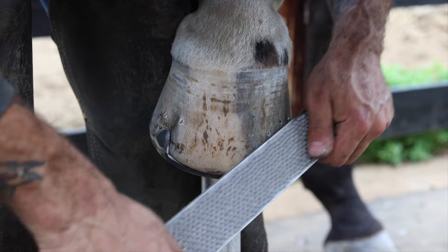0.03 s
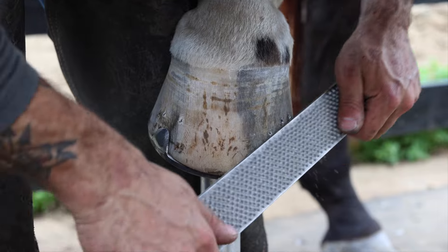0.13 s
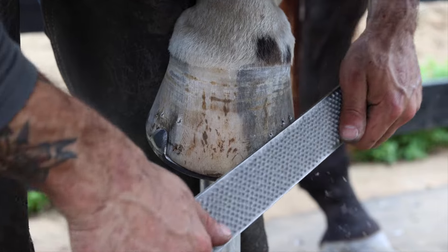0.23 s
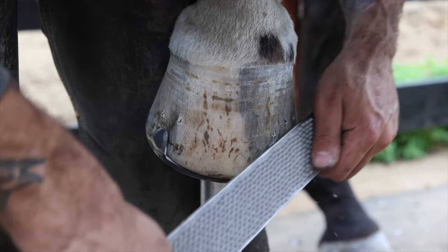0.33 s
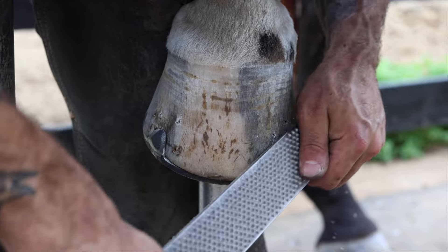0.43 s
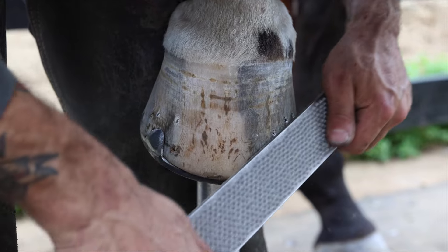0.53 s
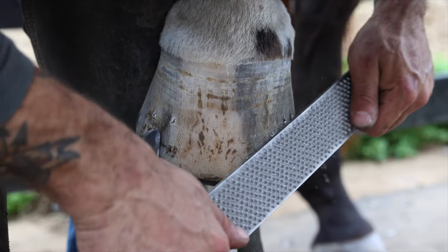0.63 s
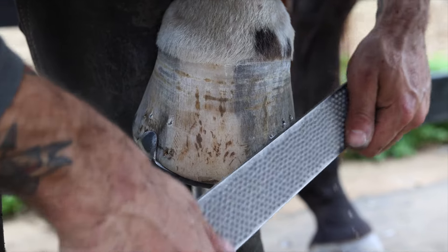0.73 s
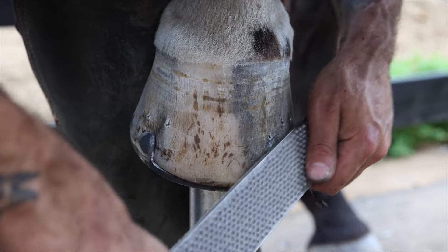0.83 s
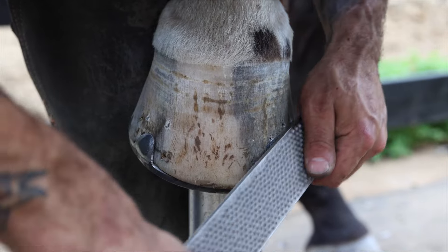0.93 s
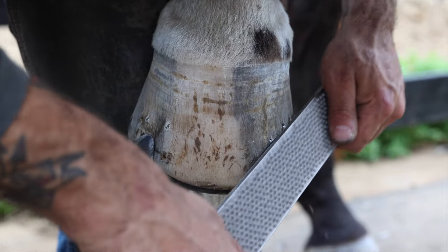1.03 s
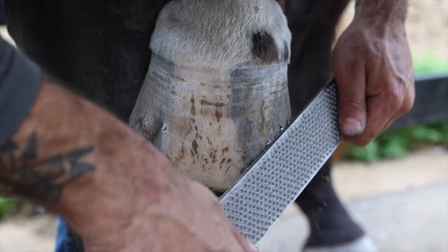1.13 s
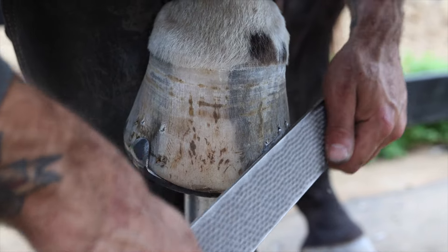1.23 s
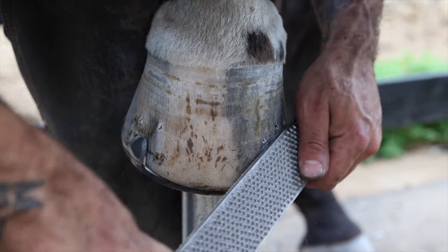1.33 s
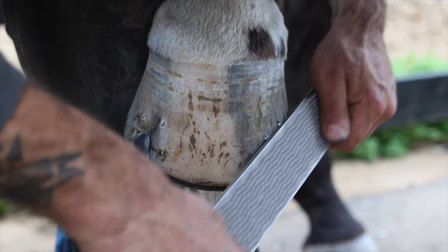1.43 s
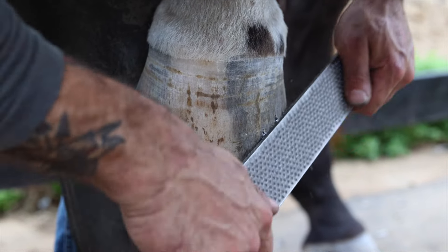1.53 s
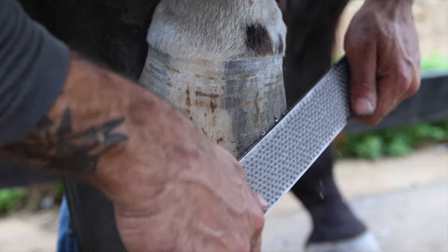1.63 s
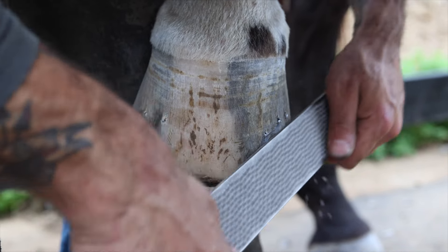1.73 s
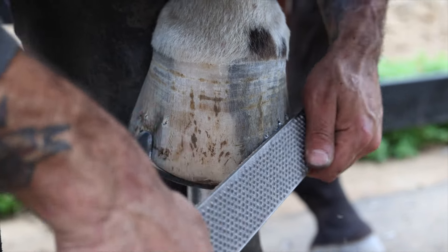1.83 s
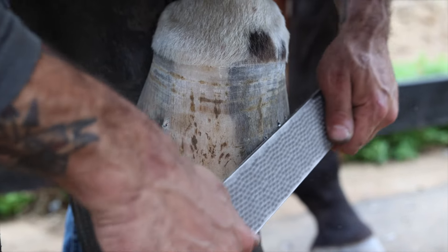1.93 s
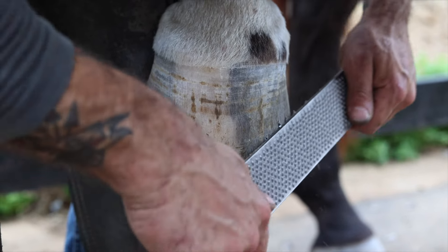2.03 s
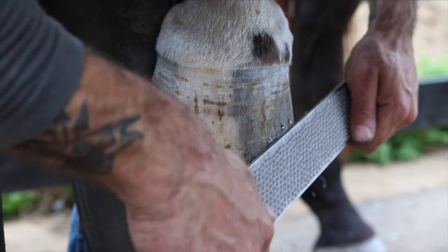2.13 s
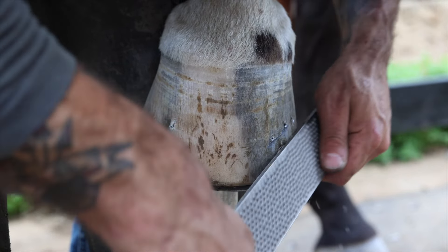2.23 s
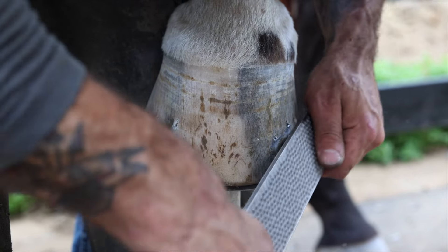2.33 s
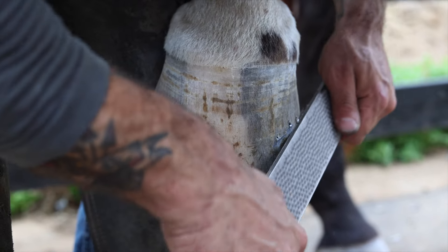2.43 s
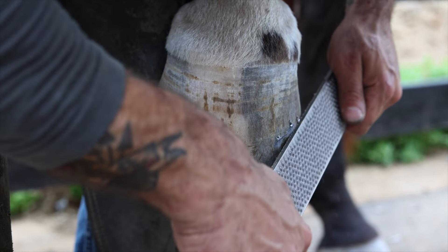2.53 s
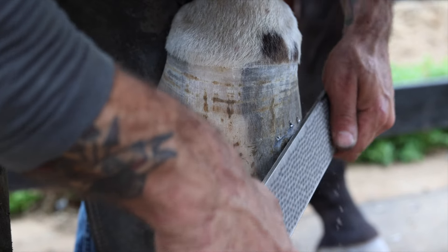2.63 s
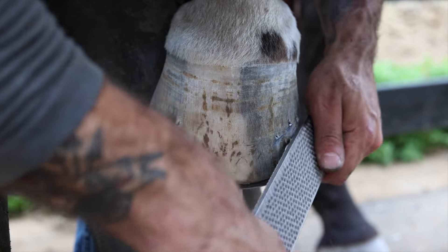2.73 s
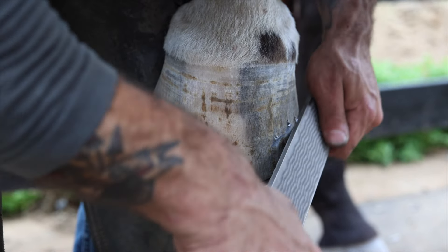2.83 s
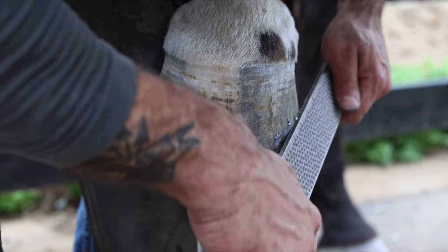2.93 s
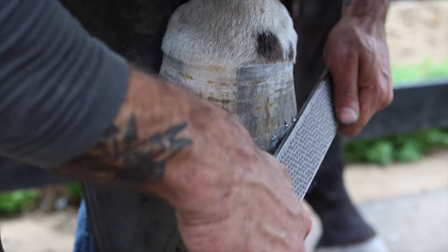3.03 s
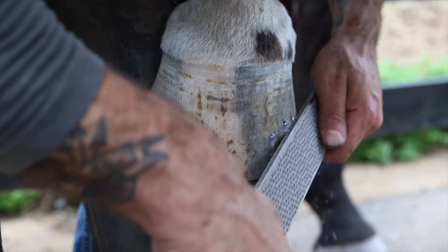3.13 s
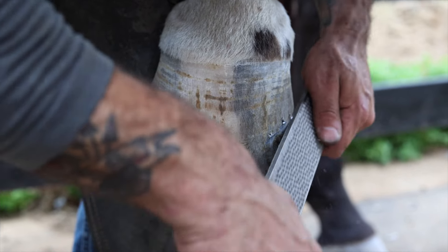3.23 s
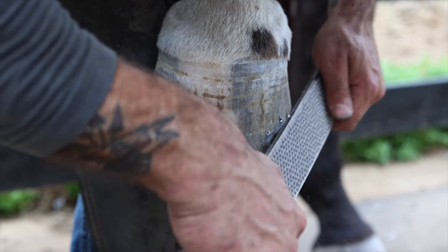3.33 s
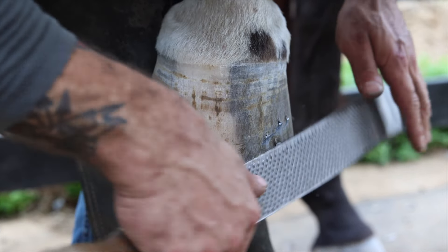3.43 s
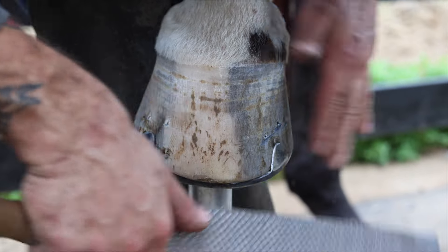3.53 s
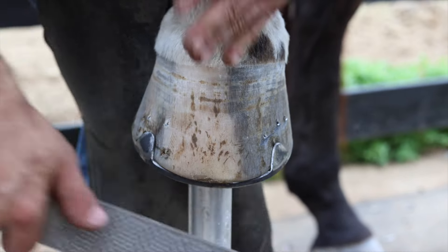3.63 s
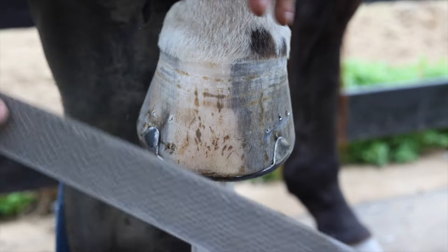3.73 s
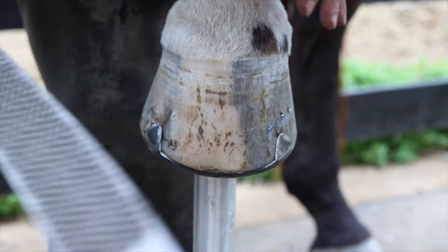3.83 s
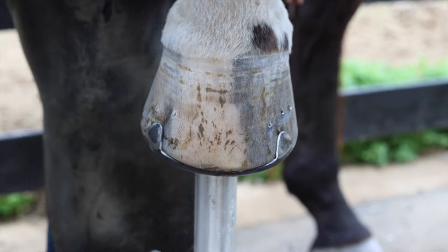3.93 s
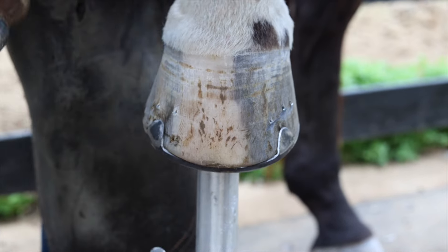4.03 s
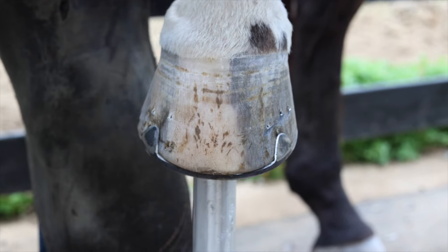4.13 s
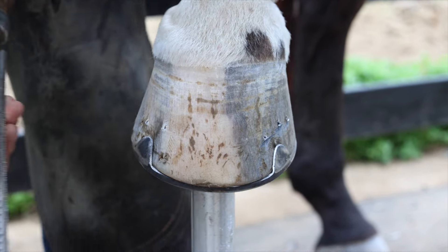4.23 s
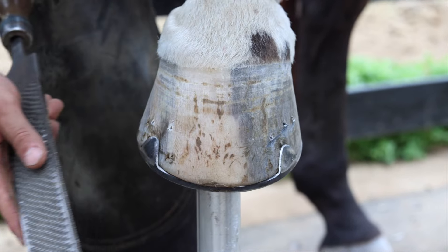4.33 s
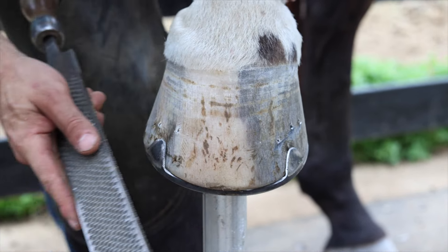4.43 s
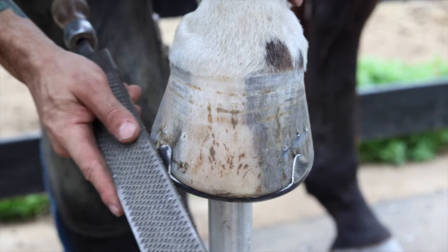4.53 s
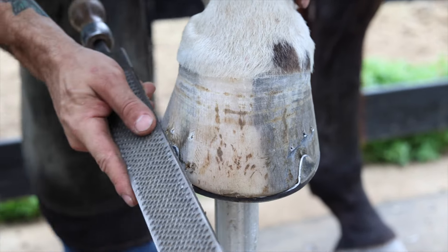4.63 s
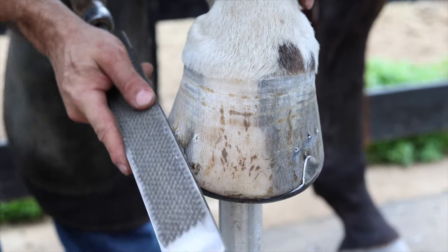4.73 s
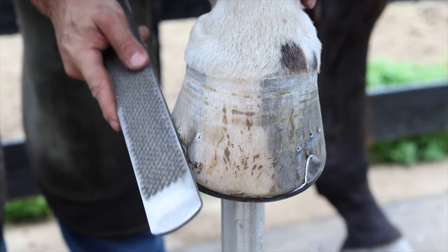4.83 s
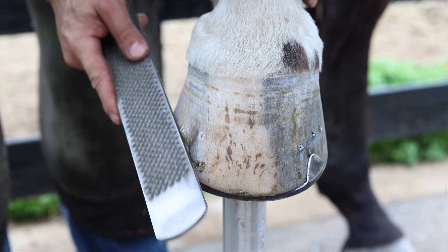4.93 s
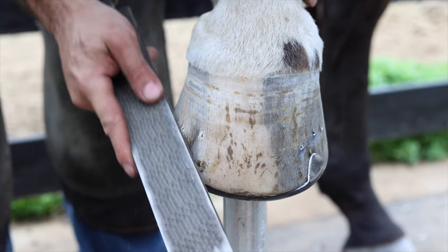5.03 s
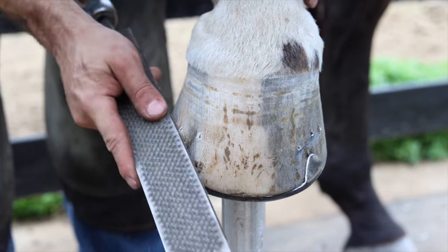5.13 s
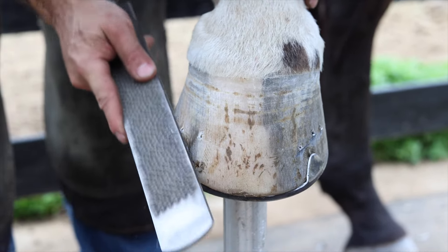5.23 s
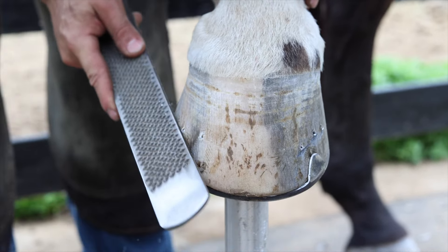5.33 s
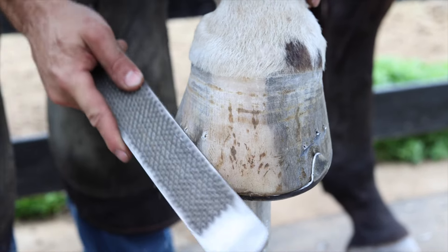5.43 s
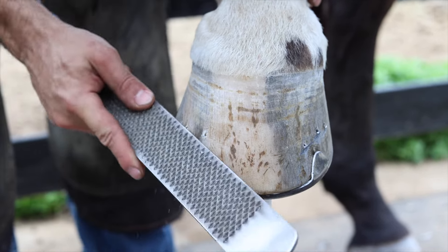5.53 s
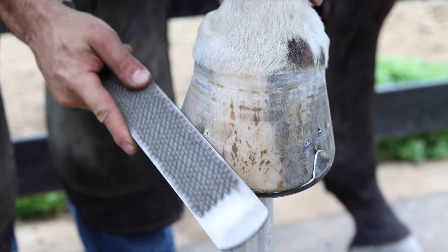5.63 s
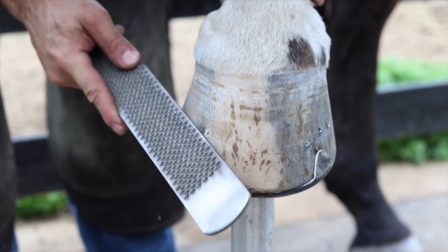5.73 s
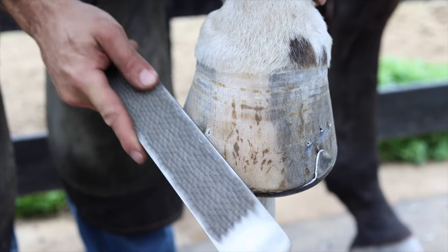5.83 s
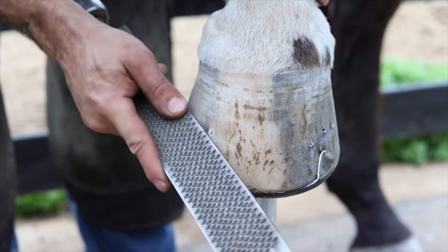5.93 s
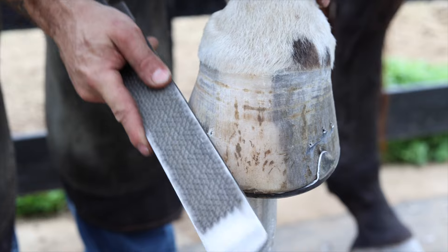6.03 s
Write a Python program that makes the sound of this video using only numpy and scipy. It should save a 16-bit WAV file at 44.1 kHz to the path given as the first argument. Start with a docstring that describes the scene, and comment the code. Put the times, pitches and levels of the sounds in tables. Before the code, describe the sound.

Coarse metallic filing on a horse's hoof outdoors, close up, with low clothing rumble and thumps, a short rustling pause, then softer strokes.

```python
"""A flat steel rasp is pushed and drawn across a hoof in the open air, first on one side, then, after a
change of grip, on the other. Random clicks shaped by each stroke make the grit and the hoof's thrum; noise
with the same strokes rings the blade, and knocks ring it too. A microphone worn on the body picks up rumble,
rubs and thumps from moving clothes, made of coloured clicks and short low tones. Brushing noise and ticks
mark the change of grip, and a faint air noise lies under it all."""
import sys
import numpy as np
from scipy import signal
from scipy.fft import rfft, irfft, next_fast_len
from scipy.io import wavfile
from scipy.ndimage import uniform_filter1d

SR = 44100
rng = np.random.default_rng(int(sys.argv[2]) if len(sys.argv) > 2 else 0)


def generate_wav(sig):
    """Save sig (samples, or channels by samples) to the path in sys.argv[1] as 16-bit PCM at SR."""
    pcm = np.round(np.clip(np.atleast_2d(sig).T, -1, 1) * 32767).astype(np.int16)
    wavfile.write(sys.argv[1], SR, pcm)


N = 268569


def gain_of(db):
    """Turns dB into a plain multiplier."""
    return 10 ** (np.asarray(db) / 20)


def evened(x):
    """Scales x to an average strength (rms) of 1."""
    return x / np.sqrt(np.mean(x ** 2) + 1e-20)


def add(mix, start_s, sound):
    """Adds a sound into mix from start_s on, cut off at the end of mix."""
    part = mix[round(start_s * SR):][:len(sound)]
    part += sound[:len(part)]


def wander(per_s):
    """A slow random drift of rms 1, heading for a new chance value per_s times a second."""
    steps = rng.standard_normal(1000)
    return evened(np.interp(np.arange(N) / SR * per_s, np.arange(1000), steps))


def clicks(per_s, spread_db):
    """Random clicks of uneven size, about per_s each second, at rms 1."""
    boost_db = spread_db * np.minimum(rng.exponential(1, N), 4)
    size = gain_of(boost_db) * rng.standard_normal(N)
    return evened(size * (rng.random(N) < per_s / SR))


def colour(x, points):
    """Filters x by a curve of (Hz, dB) points, at rms 1."""
    point_hz, point_db = np.transpose(points)
    size = next_fast_len(N)
    hz = np.fft.rfftfreq(size, 1 / SR)
    curve_db = np.interp(np.log(hz + 1), np.log(point_hz + 1), point_db, left=-90)
    return evened(irfft(rfft(x, size) * gain_of(curve_db), size)[:N])


def patchy(x, depth_db):
    """Makes the colour shift in random patches of time and pitch."""
    spectrum = signal.stft(x, nperseg=256)[2]
    patches = rng.standard_normal(spectrum.shape)
    patches = uniform_filter1d(patches, size=4, axis=0)  # smooth across pitch
    patches = uniform_filter1d(patches, size=9, axis=1)  # smooth across time
    return evened(signal.istft(spectrum * gain_of(depth_db * evened(patches)), nperseg=256)[1][:N])


# a contact starts and ends this many dB down (times follow), along these powers
EDGE_DB, RISE_CURVE, RELEASE_CURVE = 39, 1.23, 0.81


def contact(rows, over_db=0, follow=1, lag_s=0, early_db=0):
    """Gain of contacts that rise, hold and let go; a layer sits over_db above the main one,
    moves follow dB for each dB of pressure and loses early_db along the hold."""
    out = np.zeros(N)
    over_db = over_db + np.zeros(len(rows))
    early_db = early_db + np.zeros(len(rows))
    for row, over, early in zip(rows, over_db, early_db):
        start, rise, hold, release, db, change_db = row[:6]
        t = np.arange(0, rise + hold + release, 1 / SR)
        spans = [(0, rise), (rise, hold), (rise + hold, release)]
        # each stage runs from 0 to 1
        rising, held, leaving = (np.clip((t - s) / max(span, 1e-3), 0, 1) for s, span in spans)
        edges = (1 - rising) ** RISE_CURVE + leaving ** RELEASE_CURVE
        shape_db = change_db * held - EDGE_DB * edges
        add(out, max(start + lag_s, 0), gain_of(db + over + follow * shape_db - early * held))
    return uniform_filter1d(out, size=90)  # about 2 ms of smoothing


# Teeth tearing horn, between the modes. Each row: pitch in Hz, strength in dB per Hz.
GRIT_TONE = [(500, -42.5), (1000, -20.5), (1900, 1.5), (2400, 20), (2900, 24), (4200, 19.5), (6200, 17),
             (7500, 8), (9000, -30)]


def grit(pressure, teeth):
    """Teeth tearing uneven horn: a dense stream of clicks with a patchy colour."""
    return pressure * patchy(colour(teeth, GRIT_TONE), depth_db=6.0)


# The finest chips. Each row: pitch in Hz, strength in dB per Hz.
CHIP_TONE = [(6500, -7.5), (8200, 5.5), (9700, -3.5), (11500, 6.5), (13000, -11), (14300, -19)]


def fine_chips(pressure, teeth):
    """The finest chips fizz: the same tooth clicks, coloured brighter."""
    return pressure * patchy(colour(teeth, CHIP_TONE), depth_db=5)


# Hoof and stand. Each row: pitch in Hz, strength in dB per Hz.
THRUM_TONE = [(120, -8.5), (220, 5.5), (350, 3.5), (500, -1.5), (600, -12.5), (800, -12.5), (1300, -21.5),
              (2000, -31)]


def hoof_thrum(pressure):
    """The hoof and its stand thrum: sparser clicks, coloured low."""
    return pressure * colour(clicks(per_s=1600, spread_db=2.0), THRUM_TONE)


def knock_train(starts_s, levels_db):
    """A short round push for each knock of the blade."""
    out = np.zeros(N)
    for start_s, db in zip(starts_s, levels_db):
        add(out, start_s, gain_of(db) * np.hanning(9))
    return out


REGRIP_S = 4.0  # the second grip begins


def ring(force, knocks, pitches, modes, drift_db):
    """Each mode is a resonance driven by noise and knocks; it swells on its own as the contact slides."""
    t = np.arange(N) / SR
    knots = np.arange(0, N / SR + .1, .045)  # a new chance swell every 45 ms
    out = np.zeros(N)
    for hz, (width, first_db, second_db, knock_db) in zip(pitches, modes):
        grip_db = np.where(knots > REGRIP_S, second_db, first_db)
        swell = gain_of(grip_db + drift_db * rng.standard_normal(len(knots)))
        push = force * np.interp(t, knots, swell) * rng.standard_normal(N)
        push += gain_of(knock_db) * knocks
        r = np.exp(-np.pi * width / SR)
        skirt = np.exp(-np.pi * 500 / SR)  # a second stage, 500 Hz wide, darkens the valleys
        turn = np.exp(2j * np.pi * hz / SR)
        rung = signal.lfilter([1 - skirt], np.poly([r * turn, skirt * turn]), push)
        out += np.sqrt(2 - 2 * r * r) * rung.imag
    return out


# The blade knocks or catches on the hoof.
# Each row: time in seconds, push in dB, push on the twisting mode in dB over it.
KNOCKS = [(0.0902, -35, -28), (0.378, -24, -9), (0.405, -34.5, 24), (0.4246, -16, 1), (0.483, -14, -14),
          (0.835, -39, -20), (0.8627, -45, -19.5), (0.9034, -41.5, -5), (0.9204, -18.5, -13),
          (1.3287, -27, -34), (1.373, -10.5, -22), (1.7499, -34, -15.5), (1.8408, -33, 0),
          (1.8506, -40, 2.5), (1.8692, -35, -20), (1.9814, -13.5, -14.5), (1.998, -8.5, -17),
          (2.0161, -6.5, -13), (2.3277, -30.5, 13.5), (2.3379, -23, 11), (2.435, -27, -20),
          (2.686, -28.5, -11), (2.726, -15.5, -10), (2.8977, -24.5, -21), (3.334, -24, -7),
          (4.6773, -27, -40), (4.7713, -43, -27), (4.79, -55, -37), (4.8183, -33.5, -16),
          (5.2997, -32, -34), (5.5253, -35, -23), (5.9294, -40, -38)]
# Pitches in Hz, one row a group: four of blade bending from low to high, the hoof stand, one twisting mode.
MODE_HZ = [
    [1050, 1200, 1540],
    [1950, 2210, 2410, 2610, 3010],
    [3600, 3880, 4560, 4740, 5625, 6250, 6735, 7390, 7980],
    [9295, 9970, 10700, 12150, 12600],
    [140, 450, 500],
    [1700],
]
# The same modes. Each entry: width in Hz, dB in the first grip, dB in the second grip, dB when knocked.
MODE_RING = [
    [(60.6, -25.5, -13, -24.5), (50, -33, -1.5, -22.5), (39.2, 2, -10.5, -1.5)],
    [(200, -10.5, 2.5, -18), (40, -1.5, 3.5, -7.5), (71, -31, 5.5, -31), (60, -10, 0, -16.5),
     (80.5, -6.5, -20, -24)],
    [(90, -8.5, -4, -9.5), (72.3, -3, 3, -7), (53.7, -7, -2, -10.5), (50, -1, -7.5, -9.5),
     (65, 2, -2, -11.5), (306.4, -19.5, -11, -5), (69.9, -0.5, -9.5, -24), (65, -24, -18.5, -23),
     (66.9, -15.5, -2, -5)],
    [(90, -2, 2, -16.5), (60, -6, -10, -17.5), (110, -5, -7, -32), (80, -3, -11.5, -38.5),
     (120, -0.5, -8, -30.5)],
    [(21.6, -1, -3.5, -40), (25, -6.5, -2, -32.5), (50.4, -3.5, -32, -32.5)],
    [(70, -5, -16, -1.5)],
]
# The same groups. Each row: dB over the pressure that drives it, drift in dB as the contact slides.
GROUPS = [(-6, 1.9), (-14, 2.5), (-12, 6), (-6, -5.5), (-0.5, 1.9), (-13, 5.5)]


def ringing(pressures):
    """Noise under the stroke pressure, and knocks, ring the blade and the hoof stand group by group."""
    starts_s, knock_db, twist_db = np.transpose(KNOCKS)
    knocks = knock_train(starts_s, knock_db)
    twists = knock_train(starts_s, knock_db + twist_db)
    blows = [knocks] * 5 + [twists]
    out = np.zeros(N)
    for pressure, blow, group, pitches, modes in zip(pressures, blows, GROUPS, MODE_HZ, MODE_RING):
        share_db, drift_db = group
        out += ring(pressure * gain_of(share_db), blow, pitches, modes, drift_db)
    return out


# Short draws and long pushes in turn, with a few light grazes between.
# Each row: start, rise, hold and release in seconds, grit level in dB, change over the hold in dB,
# then in dB over the grit: lowest blade modes, upper blade modes, finest chips, hoof thrum.
STROKES = [ (0.0, 0.002, 0.031, 0.025, -46, -12.5, 20.5, 9, -25, -11),
           (0.048, 0.047, 0.16, 0.067, -47.5, -4, 12.5, 8, -17, -8),
           (0.301, 0.034, 0.068, .03, -55.5, 6.5, 14.5, 1, -23, -10),
           (0.404, 0.025, .06, 0.021, -34, 3, 7, 5, -30, -30),
           (0.502, 0.091, .13, 0.14, -33.5, -16.5, 3.5, 3, -21, -12),
           (0.785, 0.027, 0.057, 0.026, -62, 4.5, 6.5, 4, -19, 1.5),
           (0.885, 0.037, 0.051, .05, -19, -19.5, 8.5, -2.5, -20.5, -28),
           (0.972, 0.1, 0.077, 0.15, -37.5, -7.5, 2.5, 4.5, -22.5, -10),
           (1.257, 0.022, 0.047, 0.018, -57, -12, 0.5, 1.5, -11.5, 2),
           (1.304, 0.026, 0.08, 0.066, -35.5, 4, 7.5, 2, -30, -21),
           (1.432, 0.057, 0.14, 0.078, -39, -6, 5.5, 8, -18, -5.5),
           (1.686, 0.031, 0.036, 0.047, -63.5, 4, -2.5, -23, -17, -5),
           (1.833, 0.011, 0.049, 0.047, -37.5, 5, 13.5, 4.5, -19.5, -18),
           (1.925, 0.059, 0.13, 0.11, -30, -16, 2, -0.5, -20.5, 0),
           (2.087, 0.012, 0.16, .06, -52.5, -14, -0.5, 3, -26, -17),
           (2.321, 0.017, 0.041, 0.015, -30, -6, 11.5, 9.5, -24.5, -19),
           (2.392, 0.071, .1, 0.078, -31.5, -6, 1, 2, -23, -7.5),
           (2.665, .09, 0.07, 0.053, -33.5, -2.5, 10.5, 11, -18, -19),
           (2.838, 0.089, 0.093, 0.026, -32.5, -2.5, -1.5, 3, -21.5, -5.5),
           (3.097, 0.057, 0.06, 0.034, -57.5, 9, 3.5, -3, -19, -4),
           (3.176, 0.058, 0.04, 0.032, -41, -7, 15.5, 5.5, -19, -22),
           (3.301, 0.038, 0.078, 0.057, -33, -4.5, 10.5, 0, -22.5, 1),
           (3.418, 0.014, 0.22, 0.095, -53, -25.5, 10, 8, -15, -5.5),
           (4.669, 0.0082, 0.0085, 0.061, -26, -5, -2.5, -3.5, -37, -16),
           (4.76, 0.019, 0.16, 0.063, -47.5, 1, 0.5, 9.5, -18.5, -6),
           (4.996, 0.035, 0.059, 0.023, -58.5, 7.5, -6.5, 1, -11, -3),
           (5.073, 0.044, 0.056, 0.08, -40.5, -7.5, 5, 6.5, -15, 1),
           (5.24, 0.064, 0.093, 0.036, -41.5, -5, 4, 9.5, -11.5, 1),
           (5.417, 0.02, 0.094, 0.041, -56.5, 8.5, -2, 1.5, -17, 2),
           (5.485, 0.047, 0.076, 0.043, -41, -19.5, 0, 12.5, -6.5, -6),
           (5.661, 0.042, 0.11, 0.031, -64.5, -4, 1, 7.5, -24.5, 6.5),
           (5.849, 0.12, 0.063, 0.18, -48, -16, -5, 12, -10, -7),
           (6.065, 0.025, .02, .02, -52, 5, 4, 0, -34, 9)]
# dB a layer moves for each dB of pressure
RING_FOLLOW, CHIP_FOLLOW, THRUM_FOLLOW = 0.96, 1.05, 0.84
THRUM_LAG_S = 0.0093
# along the hold, twisting and middle modes die down while thrum and chips grow
TWIST_FADE_DB, MIDDLE_FADE_DB, THRUM_GROW_DB, CHIP_GROW_DB = 24, 1, 1, 2
LOW_FADE_DB_PER_S = 37  # the longer the blade is pressed down, the more the hoof damps its lowest modes


def rasp():
    """Stroke pressure shapes clicks into grit, chips and hoof thrum, and noise that rings the steel."""
    columns = np.transpose(STROKES)
    hold_s = columns[2]
    low_db, upper_db, chip_db, thrum_db = columns[6:]
    middle_db = (low_db + upper_db) / 2

    bites = uniform_filter1d(abs(clicks(per_s=180, spread_db=5.0)), size=90)  # a row of teeth digs in
    uneven = gain_of(1.1 * wander(per_s=52)) * (1 + 0.15 * evened(bites))

    low = uneven * contact(STROKES, low_db, RING_FOLLOW, early_db=LOW_FADE_DB_PER_S * hold_s)
    middle = uneven * contact(STROKES, middle_db, RING_FOLLOW, early_db=MIDDLE_FADE_DB)
    upper = uneven * contact(STROKES, upper_db, RING_FOLLOW)
    chips = uneven * contact(STROKES, chip_db, CHIP_FOLLOW, early_db=-CHIP_GROW_DB)
    thrum = uneven * contact(STROKES, thrum_db, THRUM_FOLLOW, THRUM_LAG_S, -THRUM_GROW_DB)
    twist = uneven * contact(STROKES, low_db, RING_FOLLOW, early_db=TWIST_FADE_DB)

    teeth = clicks(per_s=8000, spread_db=4.5)
    out = grit(uneven * contact(STROKES), teeth)
    out += fine_chips(chips, teeth)
    out += hoof_thrum(thrum)
    return out + ringing([low, middle, upper, chips, thrum, twist])


# Rumble of clothes on the microphone, rising and sinking throughout.
# Each row: time in seconds, level in dB.
RUMBLE = [(0.0, -49), (0.59, -50.5), (0.75, -44.5), (1.12, -49.5), (1.36, -43.5), (1.54, -49),
          (1.95, -45.5), (2.02, -50.5), (2.83, -47.5), (3.15, -35), (3.78, -62.5), (4.27, -59.5),
          (4.51, -39.5), (4.65, -53), (4.8, -51), (5.36, -54), (5.73, -62), (6.09, -52.5)]
# Its colour. Each row: pitch in Hz, strength in dB per Hz.
RUMBLE_TONE = [(15, -64), (25, -24), (78, 1.5), (112, 7.5), (145, 5), (204, -0.5), (360, -20.5), (420, -23),
               (550, -26.5), (920, -120)]
# Louder rubs. Each row: start in seconds, length in seconds, level in dB.
RUBS = [(0.163, 0.045, -40), (0.35, 0.083, -48.5), (0.483, 0.056, -39), (0.605, .19, -38),
        (0.842, 0.1, -37.5), (1.104, .09, -41), (1.231, 0.044, -38), (1.324, 0.025, -31.5),
        (1.386, 0.067, -36), (1.464, 0.038, -37), (1.531, 0.04, -31.5), (1.689, 0.27, -35),
        (1.96, 0.16, -37), (2.226, 0.017, -33), (2.265, .09, -30.5), (2.444, 0.16, -31),
        (2.948, 0.08, -40.5), (3.073, .2, -30.5), (3.348, 0.033, -29.5), (3.613, 0.1, -32.5),
        (3.946, 0.043, -52.5), (4.321, 0.12, -34.5), (4.425, 0.074, -26), (4.513, .11, -34),
        (4.706, 0.15, -40), (4.963, 0.11, -42.5), (5.145, 0.082, -37), (5.272, 0.07, -41),
        (5.995, 0.023, -45)]
RUB_EDGE_DB = 32.5  # a rub swells from this far under its level and sinks back


def clothes_rubbing():
    """Cloth rubs on the microphone: low-coloured clicks make a lumpy rumble with louder rubs."""
    rumble_db = np.interp(np.arange(N) / SR, *np.transpose(RUMBLE))
    level = gain_of(rumble_db + 2.6 * wander(per_s=59))
    for start_s, length_s, db in RUBS:
        across = np.linspace(-1, 1, round(length_s * SR))
        add(level, start_s, gain_of(db - RUB_EDGE_DB * across ** 4))
    level = uniform_filter1d(level, size=300) * gain_of(0.46 * wander(per_s=20))
    return level * colour(clicks(per_s=600, spread_db=1.0), RUMBLE_TONE)


# Single thumps on the microphone. Each row: start in seconds, peak in dB, pitch in Hz.
THUMPS = [(0.282, -19.5, 124), (1.275, -23, 101.9), (1.676, -24, 108.6), (2.588, -15, 133),
          (2.713, -22, 141.4), (3.113, -26.5, 128), (3.165, -16.5, 116), (3.639, -23, 121),
          (4.447, -32.5, 118.3), (5.124, -19.5, 154.5), (5.462, -27.5, 126)]
THUMP_PEAK_S = 0.0083  # a thump swells to its peak in this time and dies a little slower


def clothes_thumps():
    """Single round thumps: low tones that swell and die quickly."""
    out = np.zeros(N)
    t = np.arange(8000) / SR
    swell = (t / THUMP_PEAK_S * np.exp(1 - t / THUMP_PEAK_S)) ** 2.9
    for start_s, peak_db, hz in THUMPS:
        add(out, start_s, gain_of(peak_db) * swell * np.sin(2 * np.pi * hz * t))
    return out


# Colour of the open air. Each row: pitch in Hz, strength in dB per Hz.
AIR_TONE = [(120, -32), (200, -1.5), (566, -1.5), (918, -11), (1850, -8), (2500, -17.5), (5310, -16.5),
            (12100, -30), (14500, -50)]
AIR_DB = -64.5


def open_air():
    """Faint coloured noise whose level drifts a little."""
    level = gain_of(AIR_DB + 0.7 * wander(per_s=9.8))
    return level * colour(rng.standard_normal(N), AIR_TONE)


# Hands and cloth brush during the change of grip.
# Each row: start, rise, hold and release in seconds, level in dB, change over the hold in dB,
# dull part in dB over the level, low part in dB over the level.
BRUSHES = [(3.624, 0.043, 0.012, 0.13, -52.5, -6, -18.5, 3.5),
           (3.791, 0.033, 0.024, 0.095, -61.5, -3.5, -11, 9), (3.927, 0.032, 0.03, 0.13, -35, 0.5, -15, -7),
           (4.081, 0.011, 0.0089, 0.065, -58, -4, -12, -21), (4.21, 0.074, 0.11, 0.14, -61.5, 4.5, 5.5, 4),
           (4.532, 0.019, 0.073, 0.11, -39, 3, -23, -3.5)]
# Colour of the main brushing. Each row: pitch in Hz, strength in dB per Hz.
BRUSH_TONE = [(880, -59), (1500, -11), (3280, 0.5), (4080, -5.5), (4830, -5), (7820, -18), (9710, -29.5),
              (11200, -26.5), (14300, -55)]
# Colour of the dull part. Each row: pitch in Hz, strength in dB per Hz.
RUSTLE_TONE = [(470, -39), (800, -10), (1160, -8), (1550, -6), (2210, -3.5), (3000, -21.5), (3900, -51),
               (6600, -120)]


def brushing():
    """Hands and cloth brush: dense clicks, a dull noise and a low noise with the hoof's colour."""
    dull_db, low_db = np.transpose(BRUSHES)[6:]
    uneven = gain_of(0.68 * wander(per_s=80))
    bright = patchy(colour(clicks(per_s=13000, spread_db=1.0), BRUSH_TONE), depth_db=2.0)
    dull = patchy(colour(rng.standard_normal(N), RUSTLE_TONE), depth_db=4.5)
    low = colour(rng.standard_normal(N), THRUM_TONE)
    out = contact(BRUSHES) * bright
    out += contact(BRUSHES, dull_db, follow=0.76) * dull
    out += contact(BRUSHES, low_db, follow=1.0) * low
    return uneven * out


# Small ticks. Each row: start in seconds, peak of the tone in dB, pitch in Hz.
TICKS = [(3.657, -43, 353), (3.8497, -39, 450), (3.9438, -25, 393), (4.0896, -46, 660), (4.1244, -66, 570),
         (4.2497, -56, 1405), (4.3163, -40, 1170)]


def ticks():
    """Small ticks while the rasp changes hands: a brief tone with a much shorter burst of noise."""
    out = np.zeros(N)
    t = np.arange(900) / SR  # cut after about 20 ms
    for start_s, peak_db, hz in TICKS:
        tone_gain = gain_of(peak_db - 60 * t / 0.085)  # falls at 60 dB per 85 ms
        noise_gain = gain_of(peak_db - 16.0 - 60 * t / 0.0034)  # falls 60 dB in 3.4 ms
        add(out, start_s, tone_gain * np.sin(2 * np.pi * hz * t))
        add(out, start_s, noise_gain * rng.standard_normal(900))
    return out


def scene():
    """All sources together, panned a little left."""
    mono = rasp() + clothes_rubbing() + clothes_thumps() + open_air() + brushing() + ticks()
    return mono * gain_of([[1.37], [-1.63]])  # left and right, in dB


def record(dry):
    """The microphone's bass is cut below 55 Hz, then everything above 14580 Hz is filtered away."""
    bass_cut = signal.butter(3, 55., "high", fs=SR, output="sos")
    cut = signal.sosfilt(bass_cut, dry)
    edge = signal.firwin(1023, 14580, window=("kaiser", 10), fs=SR)
    return signal.oaconvolve(cut, edge[None], "same")


dry = scene()
out = record(dry)
generate_wav(out)
```